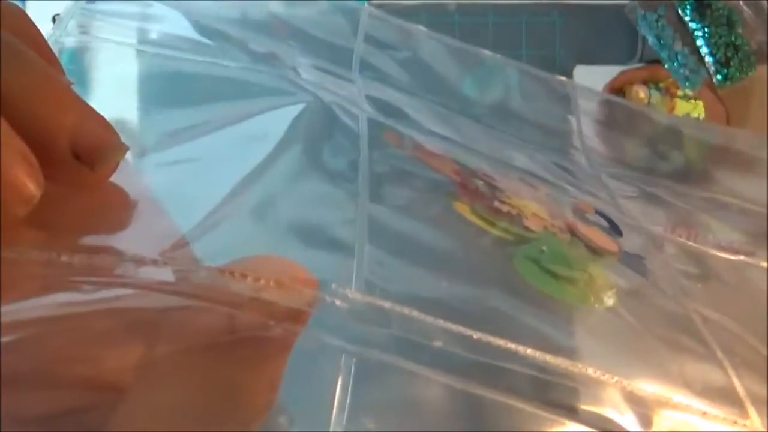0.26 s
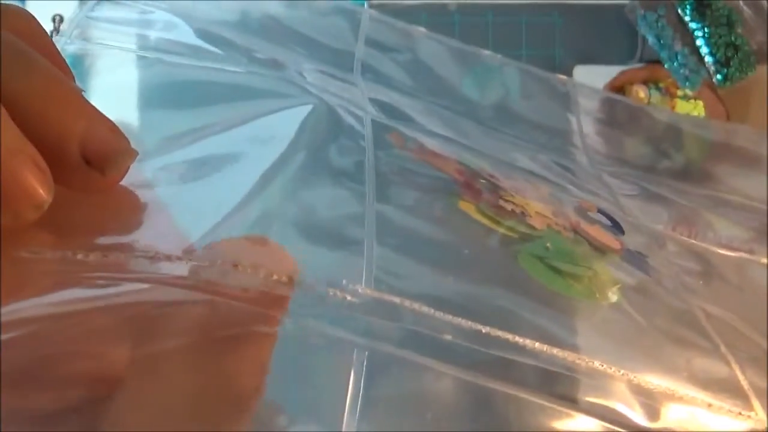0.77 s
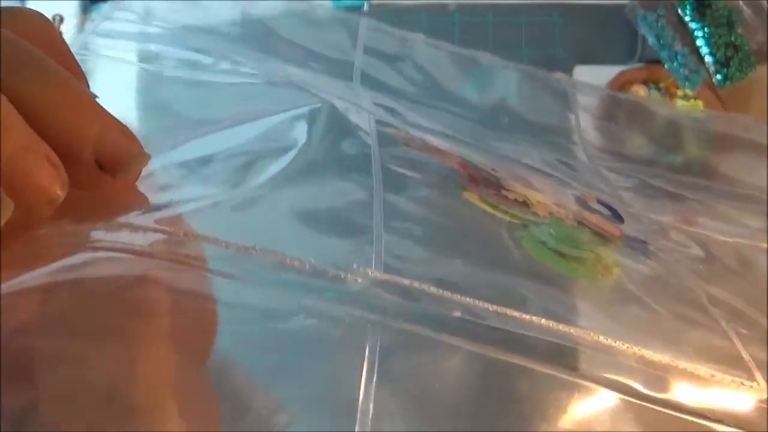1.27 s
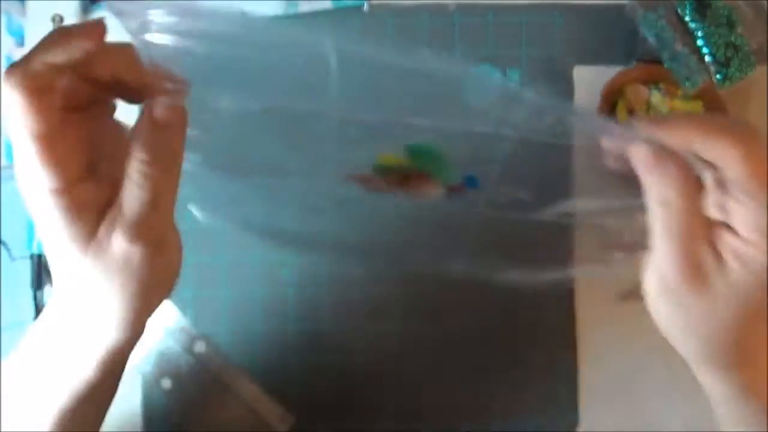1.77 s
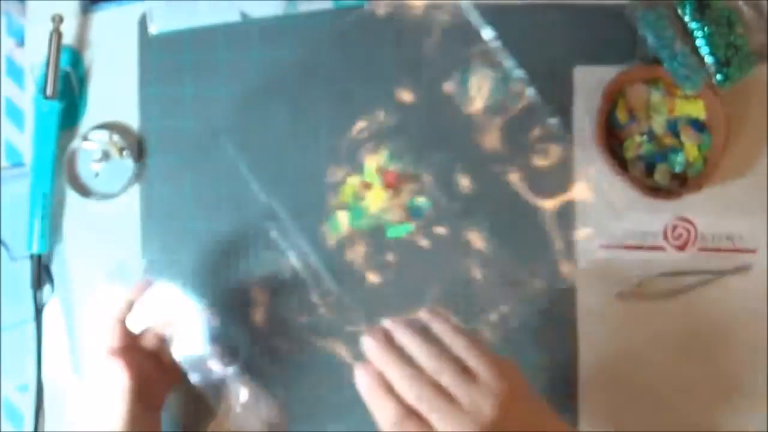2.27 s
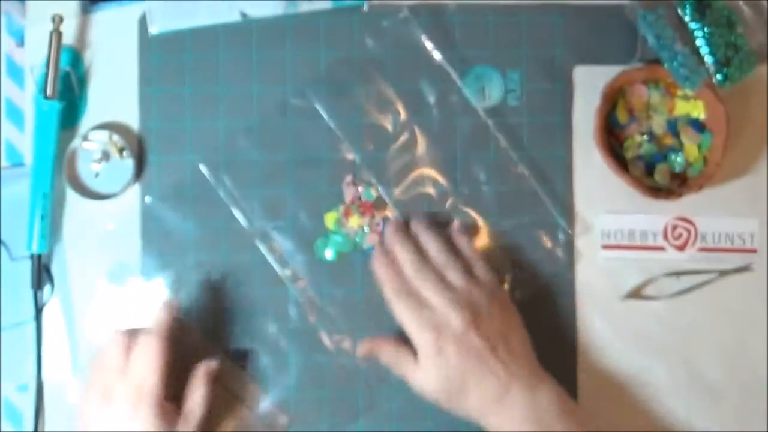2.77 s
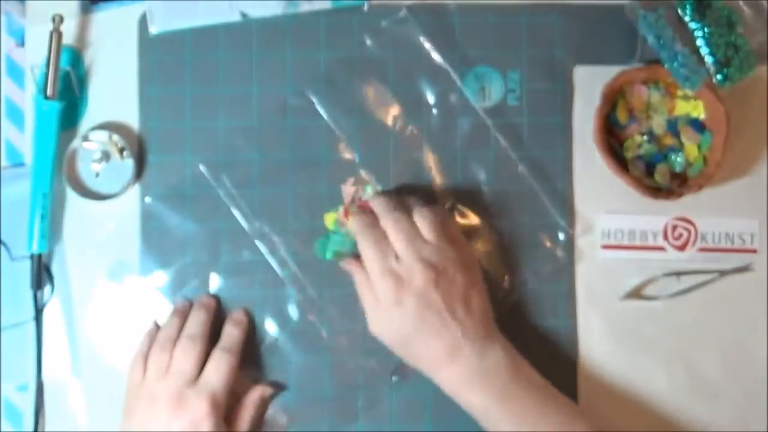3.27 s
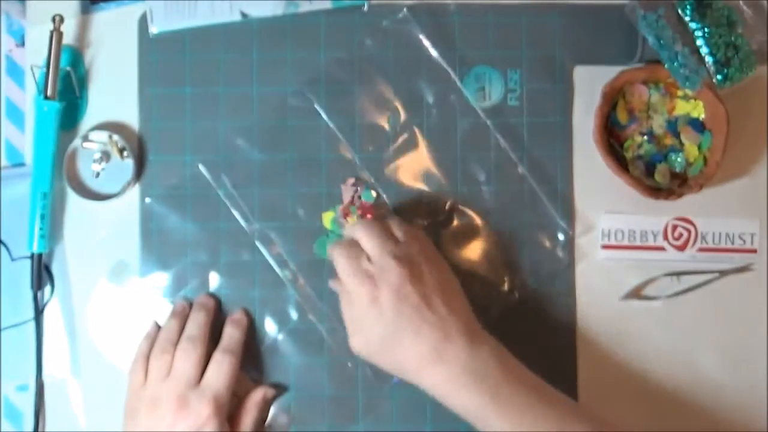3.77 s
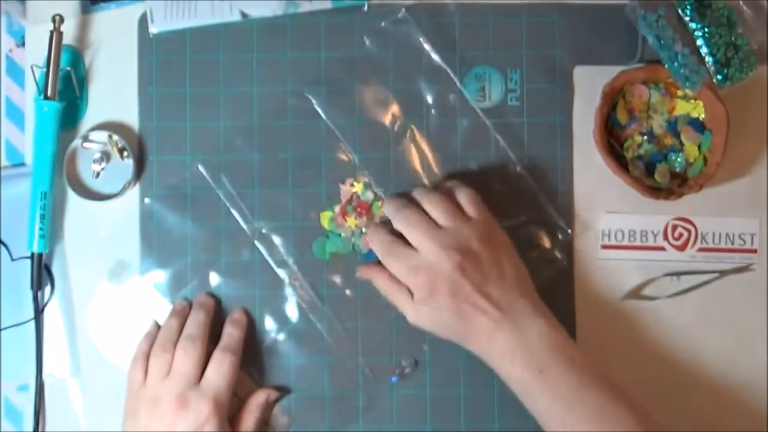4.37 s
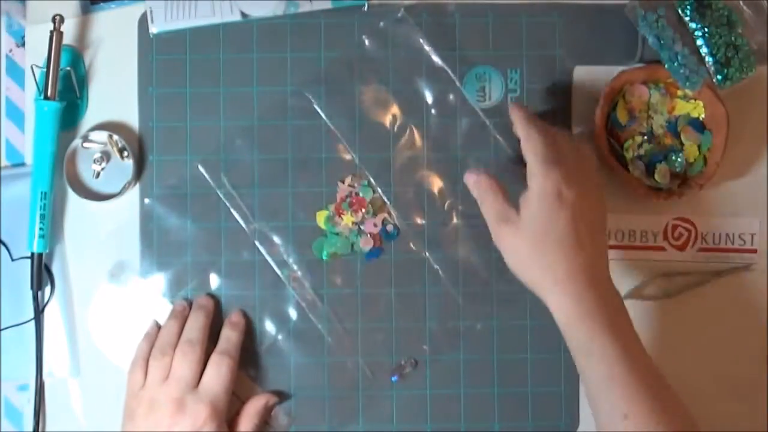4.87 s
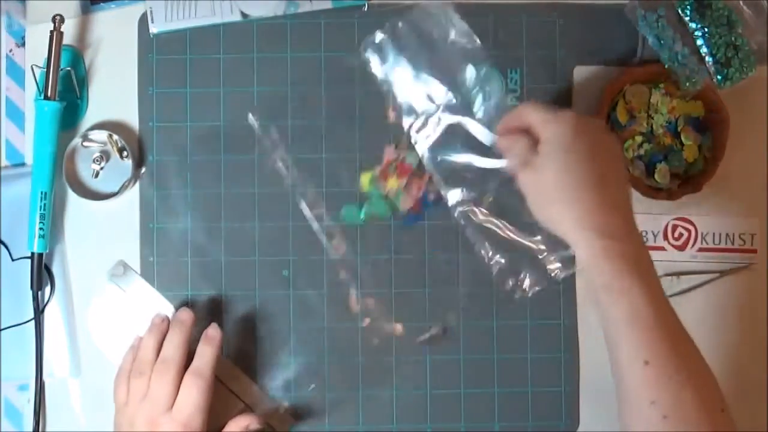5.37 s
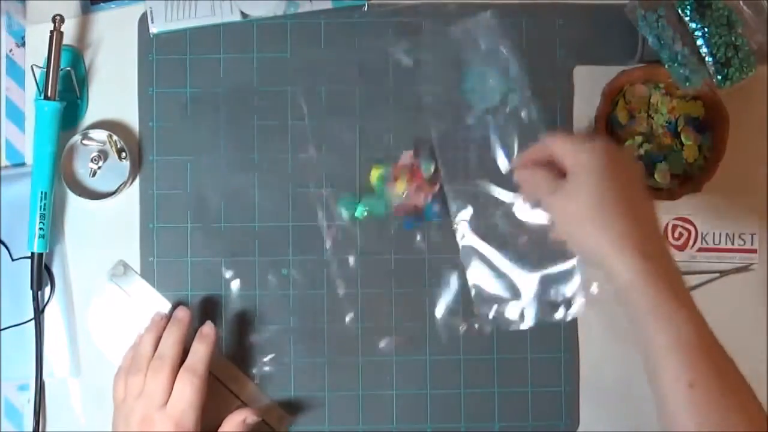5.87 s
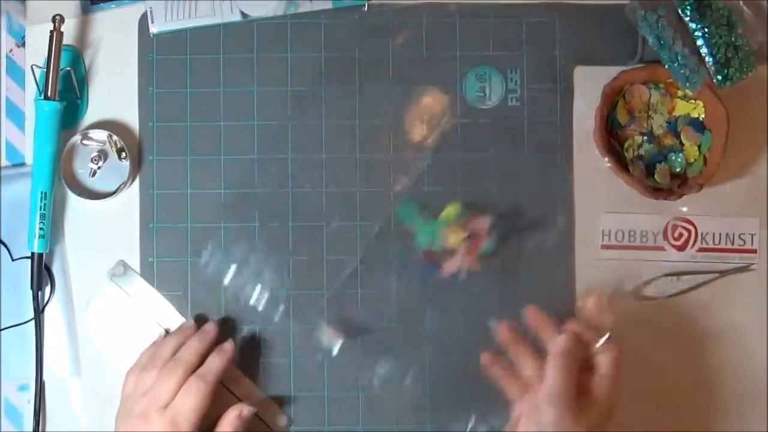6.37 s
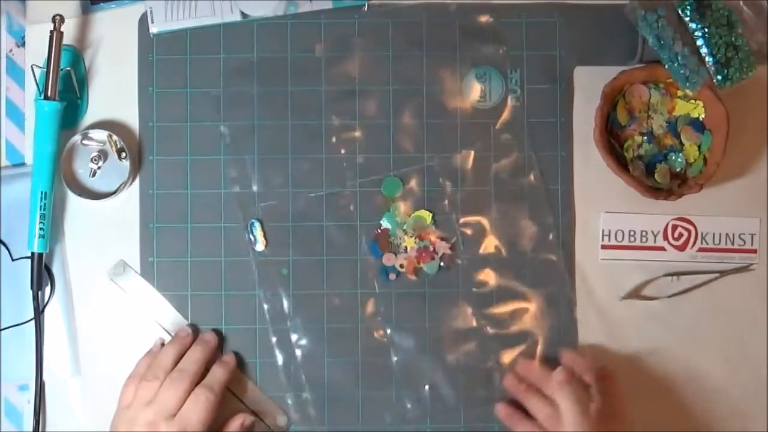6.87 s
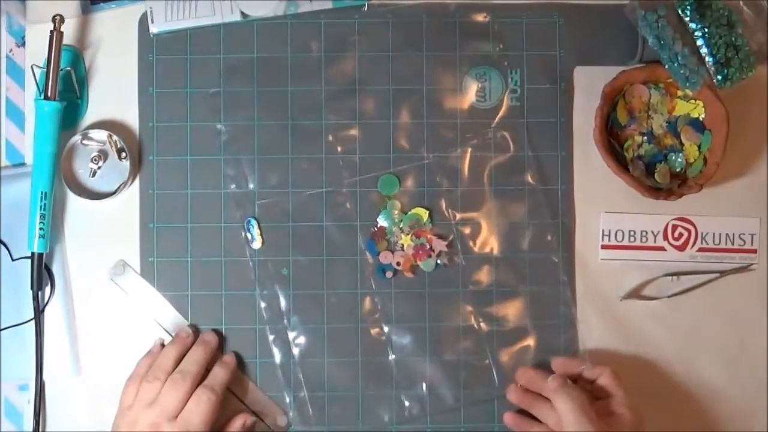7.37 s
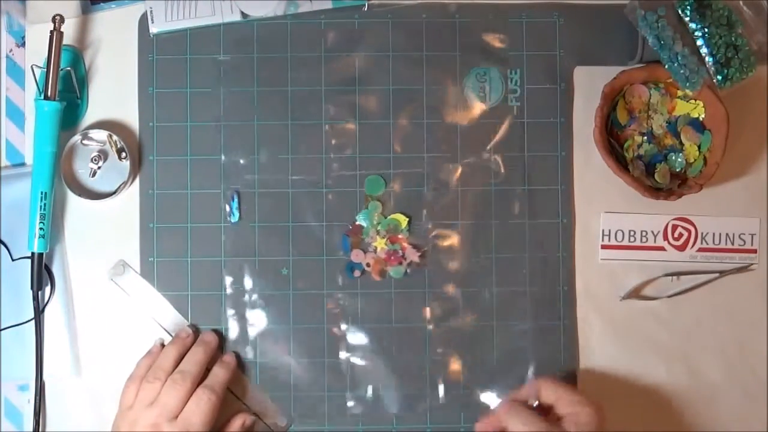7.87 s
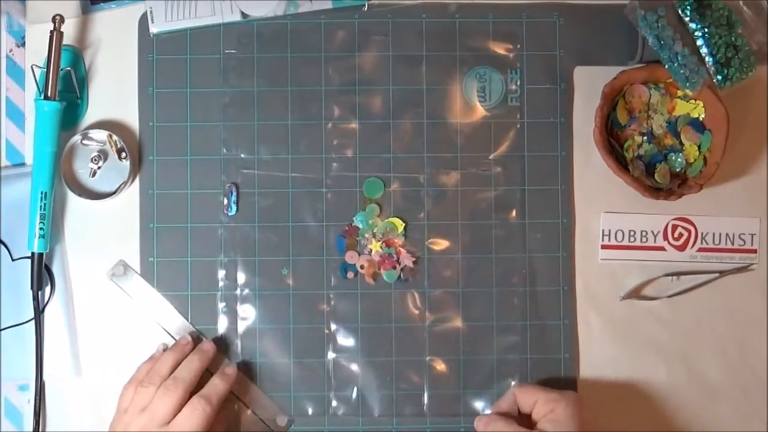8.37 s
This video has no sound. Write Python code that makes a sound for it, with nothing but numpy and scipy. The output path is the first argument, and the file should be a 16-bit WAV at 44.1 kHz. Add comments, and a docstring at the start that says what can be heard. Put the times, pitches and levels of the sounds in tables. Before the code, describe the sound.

A thin plastic sheet is handled close to the microphone in a quiet room. It starts with light rustles and scattered crackles. Then hands smooth it across a table, with hissy swishes, sharp snaps and soft low thuds. The sheet is lifted and shaken, crinkling and flapping more busily, before it settles with a few last crackles. A faint room hush and hum lie underneath.

```python
"""Plastic sheet handled over a table.

Hands turn, press and shake a thin sheet, close up, in a quiet room. The film rustles as it slides,
its panels flap, and creases let go with a pop, a crack and a fizz that the walls briefly return.
Fingertips, knuckles and the sheet land on the table top, which swings a few low cycles.
Underneath: room hush, hum, a faint regular tick and a far dove."""
import sys
import numpy as np
from scipy import signal
from scipy.fft import rfft, irfft, next_fast_len
from scipy.io import wavfile
from scipy.ndimage import uniform_filter1d, map_coordinates

SR = 44100
rng = np.random.default_rng(int(sys.argv[2]) if len(sys.argv) > 2 else 0)


def wrap_up_sound(samples):
    """Save the sound to the file named by the first command line argument, as 16-bit audio."""
    columns = np.atleast_2d(samples).T
    # keep every value between -1 and 1, then stretch to whole-number steps
    tamed = np.clip(columns, -1, 1)
    steps = np.round(tamed * 32767).astype(np.int16)
    wavfile.write(sys.argv[1], SR, steps)


N = 380583

# room hush: (frequency [Hz], relative density [dB])
HUSH_SPECTRUM = [(13, -41), (22, -26), (38, 3), (75, -11), (155, -9), (267, -7), (405, -8.5), (486, -11),
                 (539, -8), (860, -10), (1450, -15.5), (2560, -15), (2850, -18.5), (5040, -19),
                 (11000, -26), (14300, -70.5), (22000, -120)]
# hush, then near sounds: (frequency [Hz], left-right correlation)
HUSH_CORRELATION = [(60, 0.97), (220, 0.5), (840, 0.047), (3140, 0.18), (11700, 0.27)]
NEAR_CORRELATION = [(60, 0.98), (220, 0.95), (840, 0.82), (3140, 0.79), (11700, 0.92)]
# mains hum and other fuzzy tones: (centre [Hz], half-width [Hz], level [dB])
HUM_BANDS = [(50.3, 6.1, -72.5), (150, 3.8, -77), (868, 67, -87), (5000, 140, -83.5)]
# lower and upper ring of the tick: (frequency [Hz], t60 [s])
TICK_RINGS = [(2550, 0.026), (2780, .02)]
# strong ticks, drifting from upper ring to lower: (time [s], lower [dB], upper [dB])
STRONG_TICK_LEVELS = [(0, -64, -55), (2.5, -71, -49.5), (4.8, -58, -60), (7, -46.5, -63), (8.63, -51, -64)]
# weak ticks: (lower ring [dB], upper ring [dB])
WEAK_TICK_LEVELS = [-62, -56]
# sheet movements: (peak time [s], rise [s], fall [s], rustle [dB], flap [dB], rumble [dB])
SHEET_MOVES = [(.01, .1, .3, -68.5, -65.5, -79), (0.084, .02, .08, -62, -62, -68),
               (0.311, 0.076, .04, -58, -57.5, -66), (0.501, .1, .2, -66.5, -73, -82),
               (0.827, 0.3, 0.14, -56.5, -57, -58), (.972, .2, .5, -59, -56.5, -55.5),
               (1.199, 0.039, .04, -49, -62, -55), (1.27, 0.17, .15, -55, -54.5, -51),
               (1.446, 0.15, .12, -56, -54, -57.5), (1.56, 0.045, 0.13, -64, -66, -58),
               (1.846, .33, 0.12, -56.5, -59, -64), (1.991, .05, .11, -57.5, -55, -62.5),
               (2.221, .6, .4, -66, -68, -70.5), (2.386, .04, .2, -47, -59, -54.5),
               (2.442, .1, .085, -48, -45.5, -67), (2.621, 0.44, .08, -61, -61.5, -69),
               (2.691, .04, 0.37, -60.5, -71, -67), (2.879, .25, .4, -50.5, -62.5, -62.5),
               (3.069, .17, .075, -40.5, -48, -56.5), (3.238, .14, .06, -40.5, -50.5, -65.5),
               (3.406, .13, .045, -39.5, -47, -46.5), (3.482, .035, .2, -40, -66, -54),
               (3.532, .12, .07, -39, -46, -49), (3.655, .065, .06, -34, -40, -40.5),
               (3.747, .13, 0.051, -37, -43, -39), (3.834, 0.065, .04, -38, -50.5, -53.5),
               (3.939, .015, .05, -43, -48.5, -50.5), (4.007, 0.042, .15, -41, -52, -67),
               (4.161, 0.32, .125, -47, -58, -53.5), (4.282, 0.17, .2, -49.5, -57, -62),
               (4.398, .11, 0.033, -47, -51, -54), (4.441, 0.026, 0.091, -43, -51, -50),
               (4.631, .3, .12, -41.5, -54.5, -64), (4.689, 0.091, .08, -42, -49, -59),
               (4.747, 0.12, 0.024, -48.5, -58, -60), (4.93, .6, .6, -67.5, -62.5, -63.5),
               (5.066, 0.04, .2, -37, -40.5, -54.5), (5.17, .05, 0.12, -34.5, -56.5, -69),
               (5.22, .1, .1, -34.5, -37.5, -55), (5.363, .12, .2, -35.5, -42.5, -57),
               (5.441, .2, .05, -37, -44, -73), (5.515, 0.031, .13, -34, -34, -49.5),
               (5.635, 0.11, .03, -33, -42, -50), (5.682, .04, 0.15, -36, -41, -55),
               (5.859, .36, .09, -36.5, -38.5, -52.5), (5.971, 0.15, 0.45, -43.5, -48, -54),
               (6.122, .3, 0.15, -41, -43.5, -72.5), (6.282, 0.054, .13, -43.5, -40.5, -69),
               (6.371, 0.036, 0.099, -32, -38, -63.5), (6.528, .22, .4, -47, -48, -59.5),
               (6.655, .3, .2, -49, -58, -62.5), (6.745, .11, .2, -40, -58, -69.5),
               (6.814, .2, .13, -36.5, -55, -57), (6.97, 0.12, .26, -59, -57, -62.5),
               (7.352, .19, 0.4, -64.5, -66.5, -70.5), (7.623, .05, .1, -59, -56, -78),
               (7.745, .04, .3, -58.5, -63, -68), (7.855, .045, .054, -40, -53, -64),
               (8.023, .3, .21, -60.5, -64, -73)]
# gained over a rise, lost over a fall: (rustle [dB], flap [dB], rumble [dB])
SWELL_DEPTHS = [23, 25.5, 22]
# sheet at rest: (rustle [dB], flap [dB], rumble [dB])
REST_LEVELS = [-82.5, -75.5, -82]
# sliding film, flapping panels, hands on the table: (frequency [Hz], relative density [dB])
RUSTLE_SPECTRUM = [(1000, -64.5), (1800, -20), (3000, -11), (6000, -7.5), (9500, -3), (11000, -8),
                   (14000, -29), (22000, -120)]
FLAP_SPECTRUM = [(200, -50.5), (400, -4.5), (900, -6), (1600, -2), (2600, -5), (3800, -7), (6000, -27),
                 (22000, -120)]
RUMBLE_SPECTRUM = [(24, -43), (40, -4), (119, -0.5), (193, 0), (249, -2.5), (321, -4), (500, -8), (650, -5),
                   (1100, -120)]
# main creases, levels before each part's trim: (time [s], pop [Hz], pop [dB], crack [dB], fizz [dB])
MAIN_CREASES = [(.1826, 990, -74, -65, -52), (.2393, 2600, -55, -61, -55), (.321, 2920, -52, -48, -48),
                (.3406, 2390, -37, -41.5, -33), (.4244, 1940, -39, -38, -32), (.585, 2000, -73, -62, -54),
                (.842, 1900, -39.5, -54, -47), (.984, 784, -49, -60.5, -46),
                (1.1213, 726, -43.5, -55.5, -47.5), (1.2277, 2130, -23.5, -34.5, -25),
                (1.4366, 2430, -38.5, -62.5, -63), (1.4725, 840, -37.5, -55.5, -53),
                (1.55, 1550, -26.5, -35, -42), (1.566, 1060, -34, -69, -59),
                (1.9779, 1930, -55.5, -46, -42), (1.9993, 1007, -43, -47, -49.5),
                (2.0903, 1370, -47.5, -60, -47), (2.3107, 934, -45.5, -60, -65),
                (2.4355, 2280, -32.5, -35.5, -50.5), (2.4459, 2130, -28.5, -47, -49),
                (2.4627, 2030, -34.5, -36.5, -52.5), (2.6244, 2210, -39.5, -42.5, -39.5),
                (2.6808, 2920, -52, -37, -39), (2.821, 1770, -45, -40, -55),
                (2.9063, 2820, -49, -42, -38.5), (3.013, 1560, -31.5, -48, -33),
                (3.0613, 2720, -45.5, -47, -31.5), (3.082, 2600, -39.5, -41, -41.5),
                (3.1033, 1610, -38, -42, -43), (3.2656, 1170, -42, -39.5, -43),
                (3.3346, 2635, -47, -35.5, -41), (3.3533, 1690, -49.5, -35, -32),
                (3.3724, 2675, -42, -24.5, -28), (3.384, 1163, -40.5, -28, -39),
                (3.4074, 2810, -36, -21.5, -24.5), (3.4869, 1170, -38.5, -22.5, -23.5),
                (3.5308, 724, -38, -35, -30), (3.5741, 1590, -43.5, -26, -39),
                (3.6451, 1564, -31.5, -29, -32), (3.6527, 1630, -28.5, -22.5, -15),
                (3.691, 1716, -30, -21, -15.5), (3.7125, 2056, -39, -23.5, -23),
                (3.7345, 2880, -26, -16, -7), (3.9299, 726, -37.5, -29.5, -29.5),
                (3.9997, 2830, -38, -53, -29), (4.0527, 2950, -23.5, -15, -13.5),
                (4.1111, 1030, -45, -38, -42), (4.2741, 2680, -31.5, -20.5, -14.5),
                (4.2815, 2640, -38, -31.5, -25.5), (4.3064, 2030, -30, -26.5, -26.5),
                (4.3906, 2800, -38, -26.5, -19.5), (4.409, 2690, -65, -32.5, -31),
                (4.4362, 2660, -28, -24.5, -12), (4.6057, 1670, -41, -28.5, -38),
                (4.6212, 2660, -35, -25.5, -32.5), (4.6813, 2800, -43, -54, -28),
                (4.7411, 2690, -45, -34, -43), (4.9273, 2440, -63, -41.5, -39),
                (5.0142, 2770, -41, -46, -42), (5.0488, 2010, -28, -31, -40), (5.0565, 2020, -19, -20, -24),
                (5.0693, 1114, -22, -21.5, -31.5), (5.0815, 2820, -26, -41.5, -31),
                (5.1014, 1520, -16.5, -22, -21.5), (5.1605, 2020, -29, -26, -18),
                (5.216, 1340, -25, -26, -33.5), (5.2548, 1910, -30, -36.5, -24),
                (5.3077, 2000, -29.5, -49.5, -43), (5.3562, 1170, -34.5, -23.5, -21),
                (5.3995, 2474, -61.5, -20, -28.5), (5.4274, 1660, -31, -50, -29),
                (5.4473, 1246, -20, -27.5, -31), (5.5161, 1083, -20, -24, -25),
                (5.5412, 1010, -29.5, -17.5, -15.5), (5.5944, 2860, -18.5, -26, -25.5),
                (5.62, 1337, -20, -41.5, -40.5), (5.6719, 1660, -21.5, -45, -35.5),
                (5.685, 1390, -17.5, -20.5, -26), (5.7443, 1270, -27, -36.5, -35.5),
                (5.7764, 1460, -18.5, -36, -23.5), (5.8241, 1097, -22.5, -41.5, -36),
                (5.8659, 1630, -39, -14, -21), (5.9564, 1340, -24, -25.5, -31),
                (5.9828, 1076, -27.5, -27.5, -44.5), (6.1122, 1950, -21, -46, -33.5),
                (6.1228, 2360, -13.5, -16, -20.5), (6.1863, 1344, -20, -22.5, -45),
                (6.2748, 2830, -28.5, -30, -35.5), (6.2872, 670, -16.5, -25, -31),
                (6.3551, 2770, -15, -20.5, -9.5), (6.3769, 2496, -22, -13.5, -16),
                (6.527, 1626, -37, -50, -33), (6.5836, 1100, -34.5, -40, -32.5),
                (6.6152, 1550, -31.5, -38, -33), (6.6506, 2050, -29.5, -29.5, -52.5),
                (6.9792, 2157, -42.5, -50, -46.5), (6.9896, 2510, -46.5, -42, -50.5),
                (7.351, 2060, -49, -57, -70.5), (7.6118, 1920, -45, -57, -44.5),
                (7.6353, 1870, -49, -46, -43.5), (7.7322, 2130, -37, -40, -21),
                (7.762, 2510, -63, -43, -36), (7.7698, 1813, -25, -37, -27),
                (7.8491, 2870, -38, -31.5, -26), (7.893, 2170, -50, -44, -43),
                (8.0139, 2016, -62, -40.5, -36), (8.0357, 2730, -53, -35.5, -46)]
# crease position: (time [s], left over right [dB])
CREASE_PAN = [(0, -1), (1.3, -5), (2, 0.5), (4.5, -0.8), (6.5, 1), (8.63, 0)]
# room decay: (frequency [Hz], t60 [s])
WALL_DECAY = [(300, 0.14), (2000, 0.044), (10000, 0.045)]
# blows on the table top: (time [s], frequency [Hz], level [dB])
TABLE_BLOWS = [(.347, 111, -44.5), (0.427, 264, -47), (0.852, 118, -42.5), (0.979, 195, -44),
               (1.077, 107, -46.5), (1.124, 263, -43.5), (1.228, 226, -35), (1.233, 490, -27),
               (1.302, 269, -47), (1.477, 242, -44), (2.314, 92, -45.5), (2.369, 79.5, -52.5),
               (3.388, 116, -33.5), (3.407, 137, -33), (3.511, 122, -39), (3.533, 168, -37.5),
               (3.636, 200, -40), (3.666, 132, -29.5), (3.698, 145, -29.5), (3.72, 317, -25),
               (3.748, 109, -35), (3.936, 113, -40.5), (3.944, 40, -48.5), (4.056, 315, -38.5),
               (4.119, 154, -42.5), (4.178, 121, -48), (4.308, 157, -40), (4.362, 170, -38),
               (4.444, 133.6, -38.5), (5.066, 360, -61), (5.088, 376, -41), (5.224, 198, -40),
               (5.453, 380.4, -42.5), (5.538, 201, -34), (5.602, 209, -39), (5.687, 376, -49.5),
               (5.773, 376, -48.5), (5.833, 387, -36), (5.961, 166, -42), (6.108, 75, -33.5),
               (6.129, 36, -43.5), (6.288, 366, -37.5), (6.364, 338, -37), (6.611, 64, -52)]
# dove coos: (start [s], pitch [Hz], short first note [dB], longer second note [dB])
COOS = [(2.47, 578, -53, -65), (4.53, 568, -65, -59.5), (8.02, 562, -61, -67.5)]
# microphone response: (frequency [Hz], gain [dB])
MIC_RESPONSE = [(20, -2.5), (11000, 0), (11200, -30), (11600, -34), (12300, -42)]


def amp(db):
    """dB to gain."""
    return 10 ** (np.asarray(db) / 20)


def unit(x):
    """Each row to rms 1."""
    return x / np.sqrt(np.mean(x ** 2, axis=-1, keepdims=True) + 1e-20)


def along(points, hz):
    """Interpolate (frequency [Hz], value) points on a log axis."""
    knots_hz, values = np.transpose(points)
    return np.interp(np.log(hz + 1), np.log(knots_hz + 1), values)


def wobble(rate_hz):
    """Smooth random curve, rate_hz knots a second."""
    knots = rng.standard_normal(int(N * rate_hz / SR) + 4)
    return map_coordinates(knots, [np.arange(N) * rate_hz / SR])


def filtered(x, response):
    """Apply a frequency response."""
    size = next_fast_len(x.shape[-1] + 4096)
    return irfft(rfft(x, size) * response(np.fft.rfftfreq(size, 1 / SR)), size)[..., :x.shape[-1]]


def band(low_hz, high_hz):
    """Fifth-order band-pass response."""
    return lambda f: 1 / np.sqrt((1 + (low_hz / (f + 1)) ** 10) * (1 + (f / high_hz) ** 10))


def rush(spectrum, correlation, patchy_db, drive=1):
    """Stereo noise, rms 1, with patches of random gain; drive shapes it before it is coloured."""
    cells = signal.stft(rng.standard_normal((2, N)), nperseg=256)[2]
    patches = uniform_filter1d(rng.standard_normal(cells.shape[1:]), size=8, axis=0)
    patches = uniform_filter1d(patches, size=6, axis=1)
    pair = drive * signal.istft(cells * amp(patchy_db * patches / patches.std()), nperseg=256)[1][:, :N]
    angle = lambda hz: np.arccos(np.clip(along(correlation, hz), -1, 1)) / 2
    colour = lambda hz: amp(along(spectrum, hz)) * [np.cos(angle(hz)), np.sin(angle(hz))]
    mid, side = filtered(pair, colour)
    stereo = np.array([mid + side, mid - side])
    return stereo / stereo.std()


def hush(level_db=-61.9):
    """Broad room noise, its level wandering slightly."""
    gain = amp(level_db + 1.6 * wobble(3.3))
    return gain * rush(HUSH_SPECTRUM, HUSH_CORRELATION, patchy_db=-0.5)


def hum():
    """Mains hum and its like: narrow noise bands, heard as wavering tones."""
    out = np.zeros(N)
    for hz, width_hz, db in HUM_BANDS:
        tone = filtered(rng.standard_normal(N), lambda f: np.exp(-((f - hz) / width_hz) ** 2))
        out += amp(db) * unit(tone)
    return out


def tick(period_s=.040015):
    """Faint two-toned ring, weak and strong in turn."""
    out, t = np.zeros(N), np.arange(2048) / SR
    starts_s = np.arange(.0005, N / SR, period_s)
    knots_s, *levels_db = np.transpose(STRONG_TICK_LEVELS)
    strong = np.arange(len(starts_s)) % 2 == 1
    for (hz, t60_s), strong_db, weak_db in zip(TICK_RINGS, levels_db, WEAK_TICK_LEVELS):
        kicks = np.zeros(N)
        level_db = np.where(strong, np.interp(starts_s, knots_s, strong_db), weak_db)
        kicks[(starts_s * SR).astype(int)] = amp(level_db + rng.normal(0, 1.4, len(starts_s)))
        ring = amp(-60 * t / t60_s) * np.sin(2 * np.pi * hz * t) * (1 - np.exp(-t / 0.0016))
        out += signal.fftconvolve(kicks, ring)[:N]
    return out


def sheet_motion(crest_roundness=1.097):
    """Rustle, flap and rumble gains: each movement swells and fades; their powers add."""
    t, power = np.arange(0, N + 64, 64) / SR, 0
    for peak_s, rise_s, fall_s, *peak_db in SHEET_MOVES:
        away = np.where(t < peak_s, (peak_s - t) / rise_s, (t - peak_s) / fall_s)
        drop_db = np.outer(SWELL_DEPTHS, away ** crest_roundness)
        power = power + amp(np.array(peak_db)[:, None] - drop_db) ** 2
    gains = np.sqrt(power + amp(REST_LEVELS)[:, None] ** 2)
    return [np.interp(np.arange(N) / SR, t, gain) for gain in gains]


def crackle(rate_hz, spread_db, t60_s):
    """Tiny releases: a gain of 1 with random jumps that die fast."""
    kicks = (rng.random(N) < rate_hz / SR) * amp(np.minimum(spread_db * rng.exponential(1, N), 10))
    return np.sqrt(1 + signal.lfilter([1], [1, -amp(-120 / (t60_s * SR))], kicks ** 2))


def film(rustle_gain, flap_gain, rumble_gain):
    """The sheet slides and rustles, its panels flap, hands rumble on the table."""
    stir = wobble(45)
    flap_over_rustle_db = 20 * np.log10(flap_gain / rustle_gain)
    grit = np.clip(1.6 * (1.5 + flap_over_rustle_db / 25), .15, 1.2)  # less flap, smoother slide
    rustle_drive = (amp(1.02 * stir) * crackle(rate_hz=77, spread_db=1.5, t60_s=0.045)) ** grit
    rustle = rush(RUSTLE_SPECTRUM, NEAR_CORRELATION, patchy_db=2.5, drive=rustle_drive)
    flap_drive = amp(0.55 * stir + 2.2 * wobble(40)) * crackle(rate_hz=28, spread_db=6.0, t60_s=0.019)
    flap = rush(FLAP_SPECTRUM, NEAR_CORRELATION, patchy_db=4, drive=flap_drive)
    rumble = rush(RUMBLE_SPECTRUM, NEAR_CORRELATION, patchy_db=-1.0, drive=amp(4.1 * wobble(22)))
    return rustle_gain * rustle + flap_gain * flap + rumble_gain * rumble


def small_creases(rustle_gain, flap_gain, count=60, scatter_db=5):
    """Random rows like MAIN_CREASES: frequent while the sheet flaps, rare while it slides."""
    odds = np.cumsum((flap_gain / np.sqrt(rustle_gain))[SR // 100:])
    at = np.searchsorted(odds, odds[-1] * (np.arange(count) + rng.random(count)) / count) + SR // 200
    draw = rng.standard_normal((count, 4))
    pop_hz = 1700 * np.exp(0.63 * draw[:, 0])
    rustle_db, flap_db = 20 * np.log10(rustle_gain[at]), 20 * np.log10(flap_gain[at])
    levels_db = np.transpose([flap_db + 6, rustle_db - 4, rustle_db - 1.5])
    return np.column_stack([at / SR, pop_hz, levels_db + scatter_db * draw[:, 1:]])


def crease_snaps(rows, pan_scatter_db=2.5):
    """A crease creaks and lets go: the panel beside it pops; a crack and a fizz trail off."""
    at_s, hz, pop_db, crack_db, fizz_db = np.transpose(rows)[:, :, None]
    pan_db = np.interp(at_s, *np.transpose(CREASE_PAN))
    pan_db += pan_scatter_db * rng.standard_normal(at_s.shape)
    t = np.arange(3072) / SR - 1 / 250
    after_s = np.maximum(t, 0)
    noise = rng.standard_normal((3, len(at_s), len(t)))
    spikes = np.argmax(t >= 0) + np.array([2, 20])  # release and its echo off the table
    noise[:, :, spikes] = 3.5 * np.sign(noise[:, :, :2])
    creak = amp(-11 + 60 * t / .012)

    def burst(source, response, t60_s, tail_db, tail_t60_s):
        """Creak, fast decay and tail; equal energy for every crease."""
        decay = amp(-60 * after_s / t60_s) + amp(tail_db - 60 * after_s / tail_t60_s)
        shaped = filtered(source * np.where(t < 0, creak, decay), response)
        return unit(shaped) * shaped.std()

    resonance = lambda f: 1j * f * hz / 4.24 / (hz * hz - f * f + 1j * f * hz / 4.4)
    panel = lambda f: band(450, 3200)(f) * (0.36 + resonance(f))
    pop = burst(noise[0], panel, t60_s=0.0082, tail_db=-17.5, tail_t60_s=0.058)
    crack = burst(noise[1], band(3070, 5620), t60_s=0.012, tail_db=-11.5, tail_t60_s=0.051)
    fizz = burst(noise[2], band(6720, 11000), t60_s=0.0074, tail_db=-6.5, tail_t60_s=0.025)
    ring_envelope = amp(-60 * after_s * hz / 16) * (1 - np.exp(-after_s / 0.00069))
    ring = ring_envelope * np.sin(2 * np.pi * hz * after_s)
    sound = amp(pop_db + 9.5) * pop + amp(pop_db - 1.0) * ring
    sound += amp(crack_db + 3.5) * crack + amp(fizz_db + 2.0) * fizz
    samples = np.round((at_s + t) * SR).astype(int).ravel()
    channels = [amp(side * pan_db / 2) * sound for side in (1, -1)]
    return np.array([np.bincount(samples, channel.ravel(), N + SR)[:N] for channel in channels])


def walls(x, delay_samples=200):
    """Room reflections: each frequency dies at its own rate; a new tail every quarter second."""
    out, step = np.zeros((2, N + SR)), SR // 4
    for start in range(0, N, step):
        hz, t, cells = signal.stft(rng.standard_normal((2, step)), SR, nperseg=256)
        tail = signal.istft(cells * amp(-60 * t / along(WALL_DECAY, hz)[:, None]), SR, nperseg=256)[1]
        tail = tail + .8 * tail[:1]  # close microphone ports share much of the tail
        wet = signal.fftconvolve(x[None, start:start + step], tail / np.linalg.norm(tail[0]), axes=1)
        arrival = start + delay_samples
        out[:, arrival:arrival + wet.shape[1]] += wet
    return out[:, :N]


def table_thuds(swing_cycles=1.94):
    """Soft blows: the table top swings a few low cycles, with a dull knock on top."""
    at_s, hz, db = np.transpose(TABLE_BLOWS)[:, :, None]
    t = np.arange(-2048, 4096) / SR
    age = t * hz / swing_cycles
    envelope = np.exp(np.where(age < 0, -9 * age * age, -3.2 * age))
    knock = unit(filtered(rng.standard_normal((len(at_s), len(t))), lambda f: (f > 120) * (f < 550)))
    swing = np.cos(2 * np.pi * hz * t + rng.uniform(-0.082, 1, at_s.shape))
    sound = amp(db) * envelope * (swing + 0.32 * knock)
    samples = np.round((at_s + t) * SR).astype(int).ravel()
    return np.bincount(samples, sound.ravel(), N + SR)[:N]


def dove(dip_db=4, fade_db=23, scoop_hz=10):
    """Soft two-part coos on one low pitch that scoops up and sags at the end."""
    out, t = np.zeros(N), np.arange(N) / SR
    for start_s, hz, first_db, second_db in COOS:
        knots_s = start_s + np.array([0, 0.087, 0.26, 0.35])  # onset, dip, second note, end
        level_db = np.interp(t, knots_s, [first_db, second_db - dip_db, second_db, second_db - fade_db])
        pitch_hz = np.interp(t, knots_s, [hz - scoop_hz, hz, hz, hz - scoop_hz / 2])
        gate = np.clip(np.minimum(t - start_s, knots_s[-1] - t) / 0.0069, 0, 1)
        out += gate * amp(level_db) * np.sin(2 * np.pi * np.cumsum(pitch_hz) / SR)
    return out


def scene():
    """Sheet and hands up close, the room around them."""
    rustle_gain, flap_gain, rumble_gain = sheet_motion()
    snaps = crease_snaps(np.vstack([MAIN_CREASES, small_creases(rustle_gain, flap_gain)]))
    room = hush() + hum() + amp(-10.5) * walls(snaps.mean(axis=0))
    handling = film(rustle_gain, flap_gain, rumble_gain) + snaps + table_thuds()
    return room + handling + tick() + dove()


def record(dry):
    """The preamp rounds the highest peaks; the microphone falls away above 11 kHz, then cuts off."""
    ceiling, band_limit_hz = .62, 12349
    rounded = dry / (1 + np.abs(dry / ceiling) ** 4) ** .25
    return filtered(rounded, lambda hz: amp(along(MIC_RESPONSE, hz)) * (hz < band_limit_hz))


dry = scene()
out = record(dry)
wrap_up_sound(out)
```